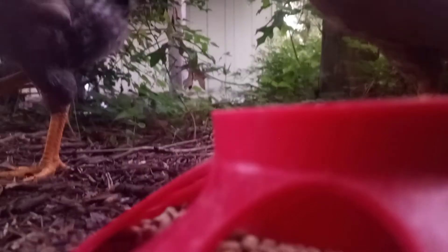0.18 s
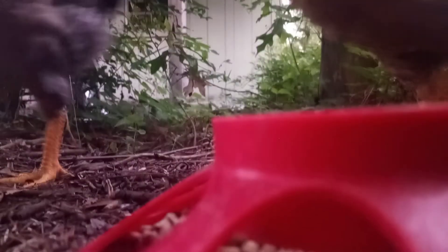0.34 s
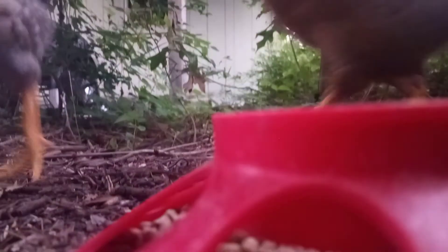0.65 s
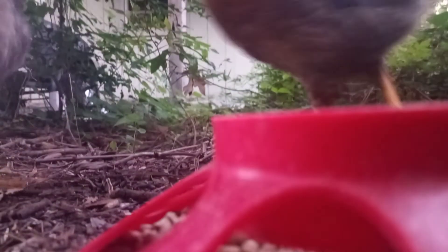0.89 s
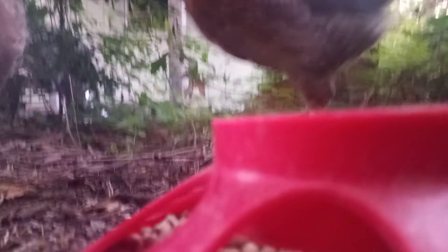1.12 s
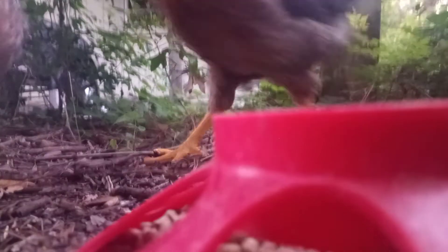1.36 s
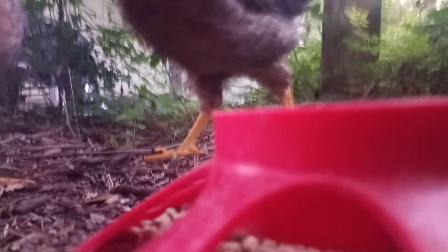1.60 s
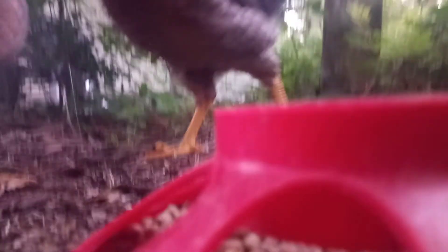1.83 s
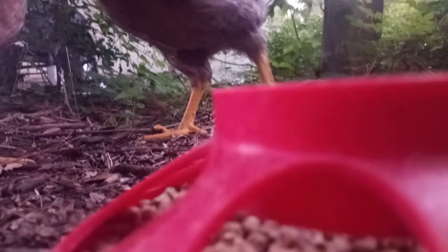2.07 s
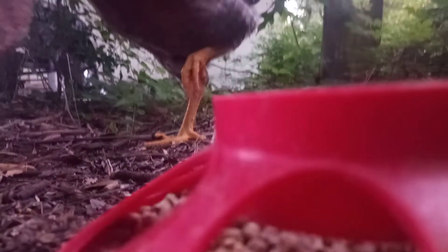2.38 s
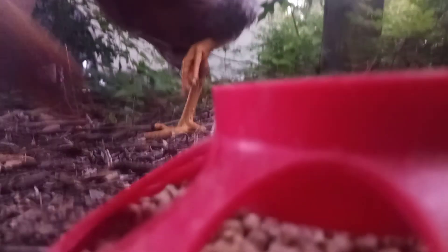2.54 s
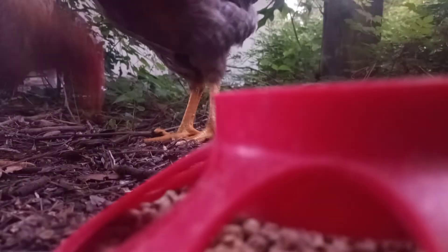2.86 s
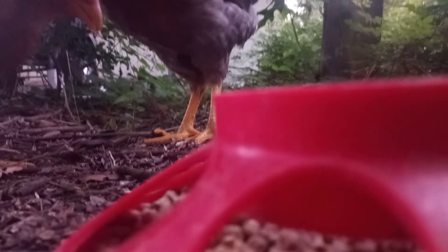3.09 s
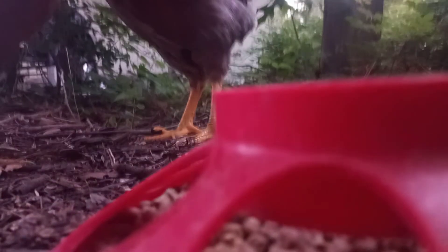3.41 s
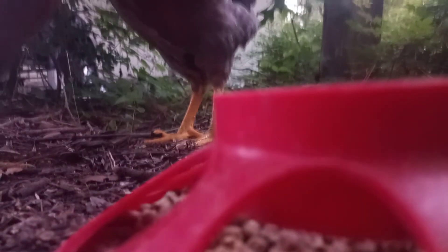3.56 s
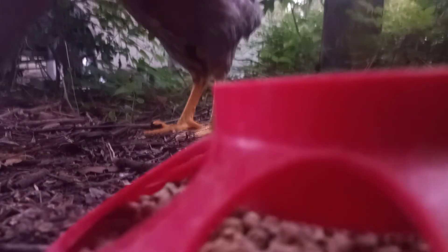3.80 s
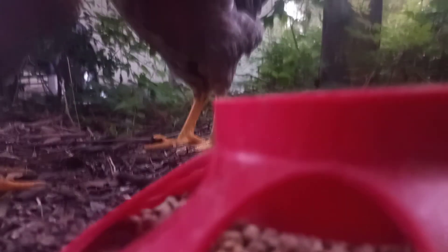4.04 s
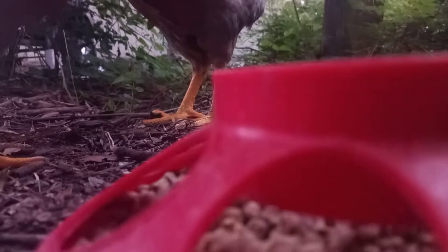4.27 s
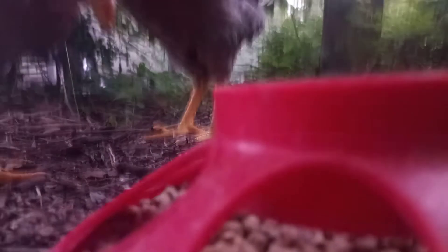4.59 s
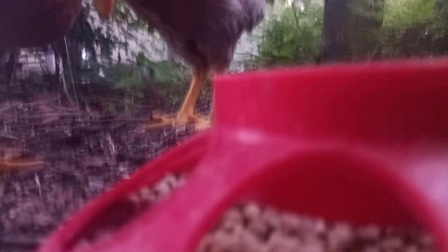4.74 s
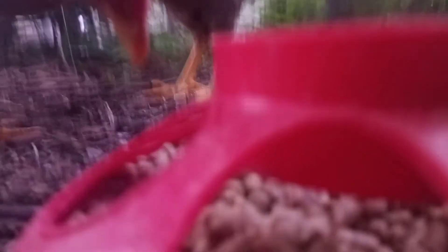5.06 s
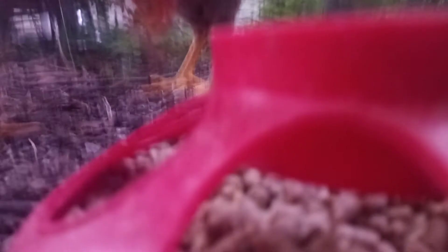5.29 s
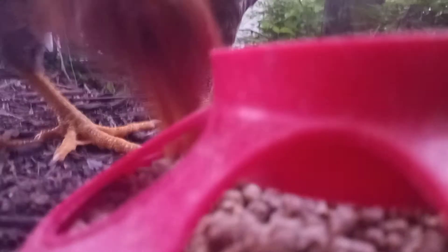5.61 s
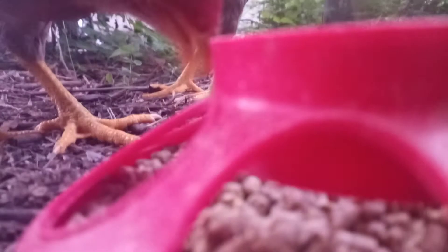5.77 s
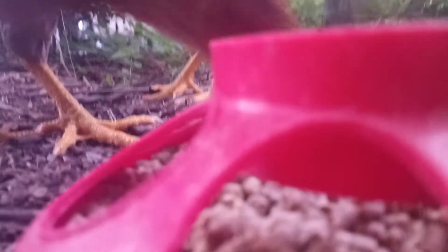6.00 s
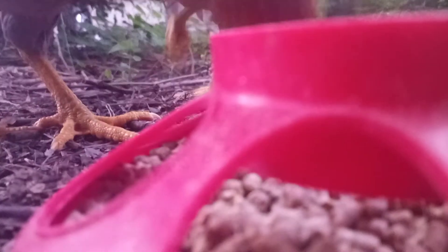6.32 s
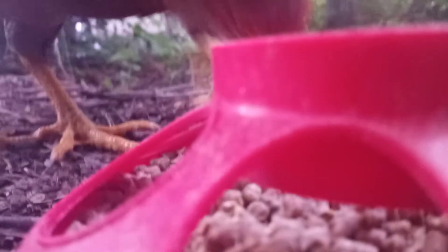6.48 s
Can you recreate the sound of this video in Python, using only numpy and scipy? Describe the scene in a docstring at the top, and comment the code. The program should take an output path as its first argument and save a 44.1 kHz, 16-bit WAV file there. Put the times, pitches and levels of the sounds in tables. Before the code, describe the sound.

Soft clucks and wavering moans of hens mix with light crackling steps and sharp beak taps on a plastic pellet feeder close to the microphone. After a quieter stretch, a near hen lets out a loud squawk that starts harsh, rattles and then clears, with firm pecks during and after it. The outdoor background is a faint, high hiss of insects over a distant rumble.

```python
"""A near hen clucks and gives a long squawk that starts harsh, rattles and then clears.
She and the hens moaning farther off make their calls with puffs of air that ring in the throat.
Their beaks tap a plastic feeder and rattle its pellets, and their feet crackle on bark and twigs.
Behind them in the wooded yard, insects hiss, a katydid rubs its wings and there is a low, distant rumble.
"""
import sys
import numpy as np
from scipy import signal
from scipy.fft import rfft, irfft
from scipy.io import wavfile
from scipy.ndimage import uniform_filter1d

SR = 44100
rng = np.random.default_rng(int(sys.argv[2]) if len(sys.argv) > 2 else 0)


def store_pcm(level_fs):
    """Save levels as 16-bit WAV."""
    pcm = np.round(np.clip(level_fs, -1, 1) * 32767).astype(np.int16)
    wavfile.write(sys.argv[1], SR, np.atleast_2d(pcm).T)


N = 292824
TIME = np.arange(N) / SR


def from_db(db):
    """Turn decibels (dB) into a number to multiply a sound by."""
    return 10 ** (np.asarray(db) / 20)


def rms_one(x):
    """Scale a sound so that its average power is 1."""
    return x / np.sqrt(np.mean(x ** 2) + 1e-20)


def in_time(rows):
    """Join (seconds, value) points with straight lines, giving a value for every sample."""
    return np.interp(TIME, *np.transpose(rows))


def gains(spectrum, size):
    """Turn (Hz, dB) points into a gain for each frequency in a sound of `size` samples."""
    hz, db = np.transpose(spectrum)
    grid_hz = np.arange(size // 2 + 1) * SR / size
    return from_db(np.interp(np.log(grid_hz + 1), np.log(hz), db))


def noise(spectrum):
    """Noise with the given tone colour and a power of 1."""
    return rms_one(irfft(rfft(rng.standard_normal(N)) * gains(spectrum, N), N))


def drift(per_s):
    """A random wander, about 1 in size, that takes a new direction per_s times a second."""
    points = rng.standard_normal(N // 20)
    return rms_one(np.interp(TIME * per_s, np.arange(len(points)), points))


def resonate(x, spectrum, size=4096):
    """Make a sound ring with the given tone colour."""
    cepstrum = irfft(np.log(gains(spectrum, size)))
    # fold the filter so that it rings only after each hit, never before
    cepstrum[1:size // 2] *= 2
    cepstrum[size // 2 + 1:] = 0
    ring = irfft(np.exp(rfft(cepstrum)))
    return signal.oaconvolve(x, ring)[:len(x)]


def add(out, s, sound):
    """Mix a sound in, starting at s seconds."""
    at = max(0, int(s * SR))
    out[at:at + len(sound)] += sound[:max(0, N - at)]


def passed(t, s, over_s):
    """Go from 0 to 1 around s seconds."""
    return np.clip((t - s) / over_s + .5, 0, 1)


def yard(x, wet_db, die_away_s=0.28):
    """Add echoes from trunks and a shed wall, and a short scatter from the leaves."""
    # Each row: delay in seconds, level in dB before the tone colour below.
    echoes = [(.019, -28), (.043, -53), (.071, -46)]
    t = np.arange(SR // 2) / SR
    scatter = rng.standard_normal(len(t)) * from_db(-60 * t / die_away_s) * (t > .006)
    response = from_db(wet_db) * scatter / np.linalg.norm(scatter)
    for s, db in echoes:
        response[int(s * SR)] += from_db(db)
    coloured = resonate(response, [(2000, 5), (8000, 4)])
    return x + signal.fftconvolve(x, coloured)[:N]


def open_air(surge_db=2.4, hush_db=-68.5):
    """A low, distant rumble that surges unevenly, over a faint hush."""
    # Each row: time in seconds, level in dB.
    rumble_levels = [(0, -53), (2.5, -56.5), (4.0, -54.5), (6.64, -52)]
    # Tone colours. Each row: frequency in Hz, relative strength in dB.
    rumble_colour = [(20, -37), (40, -33), (65, -3.5), (85, 0), (135, 1), (200, -4), (260, -13.5),
                     (350, -33), (600, -42), (2000, -78)]
    hush_colour = [(100, 1), (300, 0), (500, -0.5), (750, -4), (950, -0.5), (1300, -12.5), (2000, -25),
                   (3000, -28), (8000, -26)]
    rumble = from_db(in_time(rumble_levels) + surge_db * drift(10)) * noise(rumble_colour)
    return rumble + from_db(hush_db) * noise(hush_colour)


def insects(chorus_gain_db=1.86, flutter_db=1.0, throb_db=1.5, throb_hz=3.65):
    """Many insects in the trees blend into a broad hiss, with one shrill, throbbing band."""
    # Each row: time in seconds, level in dB before the changes below.
    chorus_levels = [(0.0, -51.5), (1.7, -55.5), (4.4, -57.4), (5.6, -53.5), (6.64, -53)]
    shrill_levels = [(0, -46), (.3, -54.5), (.8, -51), (4.3, -53), (6.64, -50.5)]
    # Tone colours. Each row: frequency in Hz, relative strength in dB.
    chorus_colour = [(2400, -30.5), (2900, -20.5), (3400, -7), (4200, -8.5), (5200, -3), (6400, 1.5),
                     (7500, 1), (8000, -10), (8900, -16.5), (9300, -7), (9700, -17), (10800, -10.5),
                     (12500, -32.5), (16000, -23)]
    shrill_colour = [(5500, -38.5), (6500, -10.5), (6850, -5), (7080, 2.5), (7350, -2), (7650, -17),
                     (8300, -37)]
    chorus = from_db(in_time(chorus_levels) + chorus_gain_db + .5 * drift(60)) * noise(chorus_colour)
    throb = throb_db * np.cos(2 * np.pi * throb_hz * (TIME - 1.73))
    shrill = from_db(in_time(shrill_levels) + throb + flutter_db * drift(80)) * noise(shrill_colour)
    return chorus + shrill


def katydid(start_s=3.252, gap_s=.0836, slowing_s=.0008, stroke_s=0.021, teeth_db=1.5, buzz_gain_db=-1.5):
    """A run of wing strokes, then a growing buzz; tiny teeth on the wing make both grainy."""
    # Each row: time in seconds, level in dB before buzz_gain_db.
    buzz_levels = [(0.0, -72), (3.0, -67.5), (4.75, -65), (5.4, -56), (6.64, -54)]
    # Each row: frequency in Hz, relative strength in dB.
    wing_colour = [(9000, -54), (11500, -9.5), (13500, -15), (14600, 1), (15600, 2.5), (17000, -12)]
    k = np.arange(13)
    times = start_s + gap_s * k + slowing_s * k ** 2 / 2 + 0.0033 * rng.standard_normal(len(k))
    levels = -53.5 - 6.0 * np.abs(times - 4)   # loudest near 4 seconds
    strokes = sum(from_db(db) * np.exp(-((TIME - s) / stroke_s) ** 2) for s, db in zip(times, levels))
    buzz = from_db(in_time(buzz_levels) + buzz_gain_db)
    scrape = rms_one(noise(wing_colour) * from_db(teeth_db * drift(400)))
    return np.hypot(strokes, buzz) * scrape


def twigs(ticks_per_s=5.0):
    """Fine twigs and dry leaves tick at random as the hens shift their feet."""
    # Each row: frequency in Hz, gain in dB.
    twig_colour = [(2500, -30), (5000, -8), (10000, 1), (13000, -4), (16000, -15)]
    ticks = (rng.random(N) < ticks_per_s / SR) * from_db(-34 + 3.0 * rng.standard_normal(N))
    return resonate(ticks, twig_colour)


def steps(snaps_per_s=3000):
    """Dry bark crackles as the hens step and scratch."""
    # Each row: loudest moment in seconds, level in dB, rise and fall time in seconds.
    footfalls = [(.008, -46, 0.03), (0.098, -58, 0.014), (0.165, -50.5, 0.05), (0.275, -53, 0.047),
                 (1.35, -51, 0.029), (1.51, -54.5, 0.054), (2.006, -52, 0.046), (3.973, -60, .06),
                 (6.4, -56, .025)]
    # Each row: frequency in Hz, relative strength in dB.
    bark_colour = [(200, -6), (700, 4), (1500, -8.5), (2500, -5.5), (4000, -5.5), (6200, 9.5), (8000, -5),
                   (11000, -21), (15000, -14)]
    snaps = (rng.random(N) < snaps_per_s / SR) * rng.standard_normal(N)
    weight = sum(from_db(db) * np.exp(-((TIME - s) / width) ** 2) for s, db, width in footfalls)
    return weight * rms_one(resonate(snaps, bark_colour))


def contacts(bounce_s=.0039, loss_db=1.3, uneven=.15):
    """A beak lands once; if it chatters, it bounces unevenly and ever more weakly."""
    # Each row: start in seconds, knock and tick levels in dB before their gains in pecks(),
    # tick brightness in Hz, chatter time in seconds.
    beak_hits = [(1.061, -41, -35.5, 4500, 0), (1.338, -60, -29.5, 6500, 0), (1.417, -41.5, -55, 3500, 0),
                 (1.489, -39, -49, 4000, .006), (1.982, -32.5, -20.5, 5800, 0), (1.997, -41, -37, 9000, 0),
                 (2.013, -33, -46, 8000, 0), (2.05, -41, -54, 4000, 0), (2.114, -34.5, -32, 6940, 0),
                 (2.204, -57, -42.5, 4500, 0), (2.8047, -39.5, -47, 4600, 0), (2.8933, -40, -43, 9000, .01),
                 (3.923, -50, -32.5, 13500, 0), (3.986, -50, -31, 12500, 0), (5.1024, -57, -27.5, 12300, 0),
                 (5.1905, -23, -32, 9100, .006), (5.201, -24, -24, 7140, .01),
                 (5.313, -62, -34, 9050, .006), (5.621, -32, -25.5, 4000, .006), (6.044, -22, -25, 4470, 0),
                 (6.052, -38, -38, 5030, 0), (6.0595, -19.5, -27.5, 6100, .006), (6.12, -45, -38, 3460, 0),
                 (6.344, -22, -21, 5450, .018)]
    for s, knock_db, tick_db, tick_hz, chatter_s in beak_hits:
        slips = uneven * rng.standard_normal(size=32)
        for k in range(1 + int(chatter_s / bounce_s)):
            lands_s = s + bounce_s * (k + slips[k] * (k > 0))
            yield lands_s, knock_db - k * loss_db, tick_db - k * loss_db, tick_hz


def pecks(tick_s=0.00049, bend_s=0.00038, rattle_s=0.0085, grains_per_s=2500,
          knock_gain_db=-7, tick_gain_db=-1, firm_db=-29):
    """Each contact is a hard tick and a knock of the plastic; shifted pellets rattle on briefly."""
    # The feeder's tones, damped by its pellets. Each row: frequency in Hz, relative strength in dB,
    # seconds to fade by 60 dB, dB lost for each dB that a peck falls short of firm_db.
    feeder = [(462, -13, 0.028, 1), (785, -13, 0.014, 0), (1120, -15, 0.017, 1.5), (1376, -6, 0.015, 2),
              (1530, -6.5, 0.02, 0.5), (1725, -6, 0.018, 0), (1947, -7, 0.017, 0), (2250, -6.5, 0.012, 0),
              (2650, -10.5, 0.0075, 0), (3294, -5, 0.012, 0), (3660, -13, 0.008, 2), (5690, -9, 0.016, 1.5),
              (6330, -2, 0.0094, -0.5)]
    hz, tone_db, ring_s, needs_force = np.transpose(feeder)[:, :, None]
    out, t = np.zeros(N), np.arange(3000) / SR
    for s, knock_db, tick_db, tick_hz in contacts():
        shifted = rng.random(len(t)) < grains_per_s / SR
        grains = 0.14 * shifted * rng.standard_normal(len(t)) * np.exp(-t / rattle_s)
        grains[0] = 1   # the beak's own hit
        # light taps sound only the rim; firm pecks flex the whole wall
        flex_db = needs_force * min(0, knock_db - firm_db)
        strengths = from_db(tone_db + flex_db + rng.normal(0, 3.27, hz.shape))
        strengths *= rng.choice([-1, 1], hz.shape)
        tones = strengths * np.sin(2 * np.pi * hz * t) * from_db(-60 * t / ring_s)
        knock = tones.sum(axis=0) * (1 - np.exp(-t / bend_s))
        band = signal.butter(2, [tick_hz * 0.38, min(tick_hz * 1.11, 19000)], "band", fs=SR, output="sos")
        tick = signal.sosfilt(band, rng.standard_normal(len(t)) * np.exp(-t / tick_s) + 1e-18)
        tick /= np.max(np.abs(tick))
        contact = from_db(knock_db + knock_gain_db) * knock + from_db(tick_db + tick_gain_db) * tick
        add(out, s, signal.fftconvolve(grains, contact)[:len(t)])
    return out


def syrinx(rows, jitter=.13, shimmer_db=5.0, rasp=.07):
    """A hen's voice box lets out one puff of air per cycle. Gives the start, puffs and level."""
    # Each row: time in seconds, pitch in Hz, level in dB, swing in cycles, roughness from 0 to 1.
    # Swing makes puffs early and late in turn, so they pair up and sound an octave lower.
    s, *curves = np.transpose(rows)
    t = np.arange(s[0], s[-1], 1 / SR)
    pitch, db, swing, rough = (np.interp(t, s, c) for c in curves)
    cycles = np.cumsum(pitch) / SR
    k = np.arange(int(cycles[-1]) + 1)
    at = np.searchsorted(cycles, k)
    # roughness upsets the timing and strength of each puff
    chance = rng.standard_normal((2000, 2))[:len(k)]
    puff_cycle = k + swing[at] * (-1) ** k + jitter * rough[at] * chance[:, 0]
    place = np.interp(puff_cycle, cycles, np.arange(len(t)))
    strength = from_db(shimmer_db * rough[at] * chance[:, 1])
    # share each puff between its two nearest samples
    puffs, whole = np.zeros(len(t) + 1), place.astype(int)
    np.add.at(puffs, whole, strength * (1 - place % 1))
    np.add.at(puffs, whole + 1, strength * (place % 1))
    # air rushes through while the voice box is open
    air = rasp * rough * np.cos(np.pi * cycles) ** 4 * rng.standard_normal(2 * SR)[:len(t)]
    return s[0], puffs[:-1] - pitch / SR + air, db


def voiced(source, throat):
    """The puffs ring in the throat; the sound is evened out and given its level."""
    start, puffs, db = source
    voice = resonate(puffs, throat)
    power = uniform_filter1d(uniform_filter1d(voice ** 2, size=600), size=600)
    soft_ends = signal.windows.tukey(len(db), min(1, 200 / len(db)))
    out = np.zeros(N)
    add(out, start, voice / np.sqrt(power + 1e-20) * from_db(db) * soft_ends)
    return out


def fade(t, attack_s, release_s, depth_db=27):
    """How a call fades in, holds and fades out, in dB."""
    fade_in = np.clip(1 - (t - t[0]) / attack_s, 0, 1) ** 2
    fade_out = np.clip(1 - (t[-1] - t) / release_s, 0, 1) ** 2
    return -depth_db * (fade_in + fade_out)


def hen_call(row, throat, attack_s=.019, release_s=.017, waver=0, swing=0):
    """A cluck or moan drops onto its pitch, then slides evenly in pitch and level."""
    s, length, hz, glide_hz, db, swell_db, rough = row
    t = np.linspace(s, s + length, 200)
    along = (t - s) / length - .5
    wobble = waver * np.interp(t, TIME, drift(70))
    drop = 0.045 * np.exp((s - t) / .017)
    pitch = (hz + glide_hz * along) * (1 + drop + wobble)
    level = db + swell_db * along + fade(t, attack_s, release_s)
    rows = np.column_stack(np.broadcast_arrays(t, pitch, level, swing, rough))
    return voiced(syrinx(rows), throat)


def far_hens(waver_db=1.1):
    """Thin, wavering moans and short clucks from across the yard, and one much farther call."""
    # Each row: start and length in seconds, pitch and its change in Hz, level and its change in dB,
    # roughness from 0 to 1.
    moan_calls = [(0.248, 0.24, 593.5, 13.5, -56, -11, 0.45), (0.429, 0.36, 590, 30.5, -50.5, -3.5, .13),
                  (0.777, 0.071, 625, 37, -47.5, -1, 0.3), (1.015, .3, 593.2, 26, -46.5, -0.5, 0.08),
                  (1.326, 0.16, 585.7, -14.5, -46, -9, 0.18), (1.704, 0.329, 599.5, 40, -49.5, 0.5, 0.08),
                  (2.359, 0.28, 630.5, -69, -60, 3, 0.23), (4.82, 0.077, 796, -11, -52, 0, 0.08)]
    cluck_calls = [(0.123, 0.036, 682, -92, -41, 1, 0.22), (1.291, .065, 547, -30, -47.5, -10, 0.3),
                   (2.285, 0.088, 550, -12, -47.5, -8, 0.77), (2.527, 0.056, 573, -5, -49, 11, 0.34)]
    # Tone colours. Each row: frequency in Hz, relative strength in dB.
    moan_throat = [(300, -9), (600, 0.5), (850, -7), (1250, -10.5), (1800, -44), (4000, -38)]
    cluck_throat = [(300, -16), (560, 2.5), (800, -11.5), (1120, 0), (1400, -25.5), (1720, -15.5),
                    (2200, -62), (4000, -58)]
    distant_colour = [(650, -35), (820, -14), (900, 4), (1000, -7), (1250, -38)]
    # Each row: time in seconds, level in dB.
    distant_levels = [(3.15, -98), (3.4, -76.5), (4.25, -72), (4.7, -84)]
    moans = sum(hen_call(row, moan_throat, attack_s=0.044, release_s=0.048, waver=0.0064)
                for row in moan_calls)
    clucks = sum(hen_call(row, cluck_throat) for row in cluck_calls)
    # many echoes smear the farthest call into a narrow hum
    smeared = from_db(in_time(distant_levels)) * noise(distant_colour)
    return (moans + clucks + smeared) * from_db(waver_db * drift(50))


def near_clucks():
    """Three clucks close by: one gruff, one round, and a creak that runs into a nasal one."""
    # Each row: start and length in seconds, pitch and its change in Hz, level and its change in dB,
    # swing in cycles, roughness from 0 to 1.
    clucks = [(4.923, 0.0633, 268, -30, -29.5, -1, .1, 0.66),
              (1.926, 0.058, 317, -20.5, -30.5, -6.5, 0, 0.18),
              (.1345, .038, 70, 5.5, -39, 4, 0.0097, 0.37), (.157, 0.1164, 333, 37, -43.5, 1, 0, 0.14)]
    # Throat colours. Each row: frequency in Hz, relative strength in dB.
    gruff = [(120, -16), (280, -4), (480, -5), (720, 0.5), (1050, -2.5), (1450, -23.5), (2000, -29),
             (2700, -57), (5000, -65)]
    rounded = [(130, -25), (320, -6), (640, -6), (960, -22.5), (1280, -23), (1600, -18.5), (1950, -21),
               (2400, -42), (5000, -61)]
    nasal = [(130, -19), (230, 4), (330, 0.5), (670, 1.5), (1000, -4), (1360, 3), (1700, -3.5), (2100, -34),
             (4000, -52)]
    return sum(hen_call((*shape, rough), throat, swing=swing)
               for (*shape, swing, rough), throat in zip(clucks, (gruff, rounded, nasal, nasal)))


def squawk_breath(start_db=-30.5, swell_db_per_s=8, waver=0.0017, waver_db=0.72):
    """One long breath grows louder while the voice goes from harsh to rattling to clear."""
    # The pitch rises as the hen pushes harder. Each row: time in seconds, pitch in Hz.
    melody = [(5.109, 274), (5.15, 270), (5.19, 285.1), (5.3, 288.3), (5.41, 300.4), (5.48, 294),
              (5.639, 297), (5.78, 301.9), (5.989, 306.5), (6.014, 276)]
    # The voice catches and turns hoarse for a moment.
    # Each row: time in seconds, rise and fall time in seconds, added roughness from 0 to 1.
    catches = [(5.548, .014, 0.11), (5.732, .06, 0.05), (5.923, .025, 0.05)]
    s, hz = np.transpose(melody)
    t = np.linspace(s[0], s[-1], 900)
    harsh = 1 - passed(t, 5.172, over_s=0.032)
    rattling = 1 - passed(t, 5.415, over_s=.04)
    hoarse = sum(amount * np.exp(-((t - at) / width) ** 2) for at, width, amount in catches)
    unsteady = np.interp(t, TIME, drift(35))
    pitch = np.interp(t, s, hz) * (1 + waver * unsteady)
    level = start_db + swell_db_per_s * (t - t[0]) + waver_db * unsteady
    level += fade(t, attack_s=.014, release_s=.024)
    swing = .002 + 0.047 * rattling + .07 * harsh + 0.14 * hoarse
    rough = 0.029 + 0.025 * rattling + 0.63 * harsh + hoarse
    return syrinx(np.column_stack([t, pitch, level, swing, rough]))


def squawk(narrows_s=5.285, opens_s=5.42, change_s=0.045):
    """The near hen's throat starts tight, narrows during the rattle and opens as the voice clears."""
    # Throat colours. Each row: frequency in Hz, relative strength in dB.
    tight = [(120, -14), (270, 5.5), (430, 0), (570, 4.5), (760, 5.5), (950, 2), (1150, -10.5),
             (1400, -3.5), (1700, -11), (2000, -19), (2400, -30), (5000, -89)]
    narrow = [(120, -23), (290, 1), (440, -1), (590, 1.5), (740, -0.5), (900, -1.5), (1030, -9), (1180, -3),
              (1330, -9), (1470, 4), (1630, -24), (2000, -25), (2500, -41), (5000, -66)]
    wide = [(120, -47), (210, -0.5), (300, 2), (450, -5.5), (600, 0.5), (900, -9.5), (1200, -5),
            (1500, -23), (1800, -26), (2100, -30.5), (2400, -37.5), (3200, -66), (4300, -34.5), (5500, -61)]
    breath = squawk_breath()
    narrowed, opened = passed(TIME, narrows_s, change_s), passed(TIME, opens_s, change_s)
    return ((1 - narrowed) * voiced(breath, tight)
            + (narrowed - opened) * voiced(breath, narrow)
            + opened * voiced(breath, wide))


def scene():
    """Near sounds have little echo; the far hens come through the leaves with more."""
    near = yard(squawk() + near_clucks() + pecks() + steps() + twigs(), wet_db=-24)
    far = yard(far_hens(), wet_db=-12)
    return (near + far + open_air() + insects() + katydid())[None]


def record(dry, cutoff_hz=15900):
    """Cut off the very highest treble steeply."""
    return signal.sosfilt(signal.ellip(10, .1, 80, cutoff_hz, fs=SR, output="sos"), dry)


dry = scene()
out = record(dry)
store_pcm(out)
```